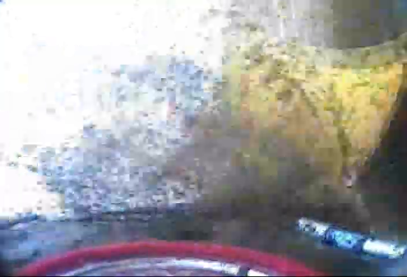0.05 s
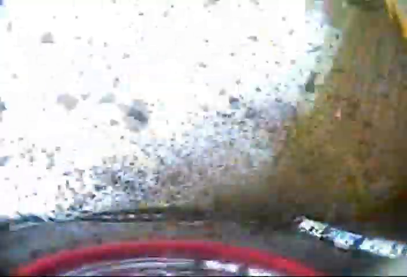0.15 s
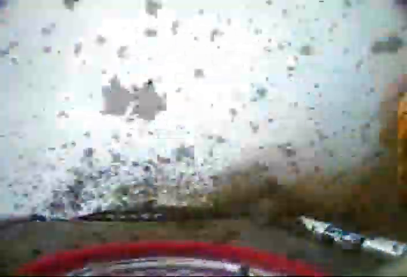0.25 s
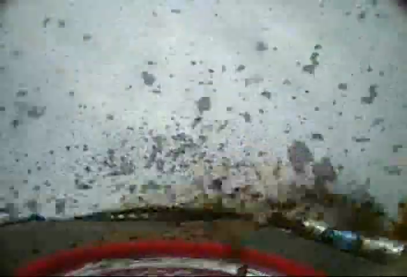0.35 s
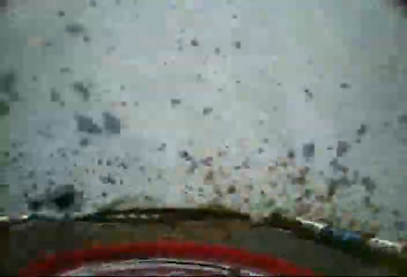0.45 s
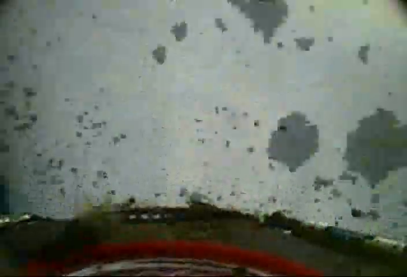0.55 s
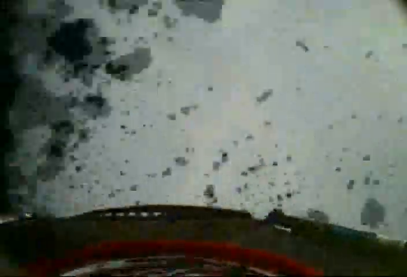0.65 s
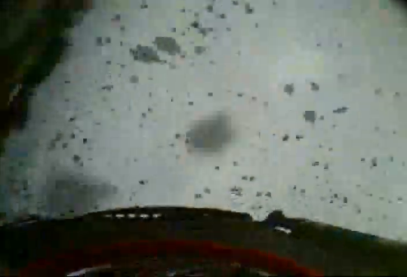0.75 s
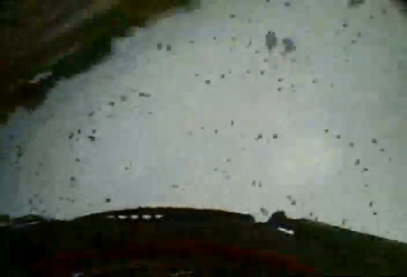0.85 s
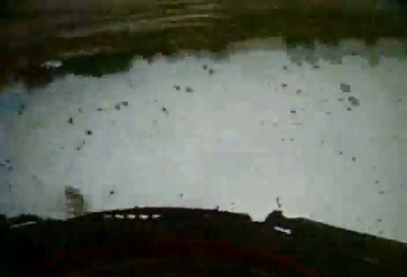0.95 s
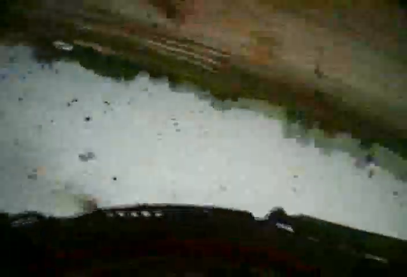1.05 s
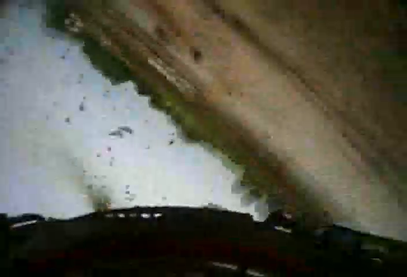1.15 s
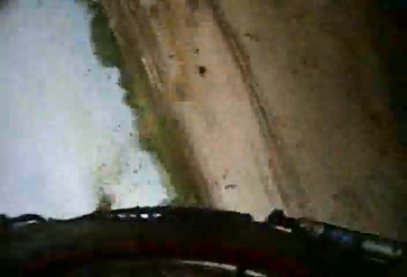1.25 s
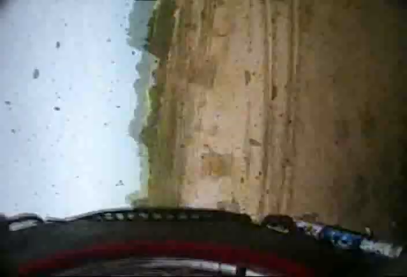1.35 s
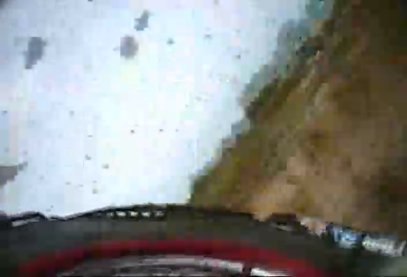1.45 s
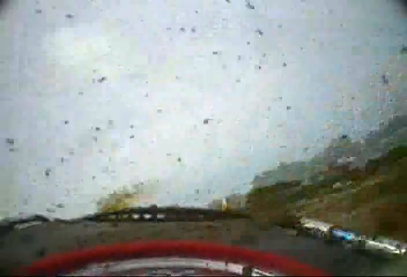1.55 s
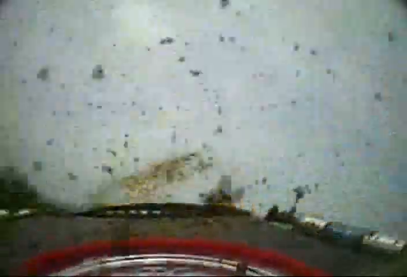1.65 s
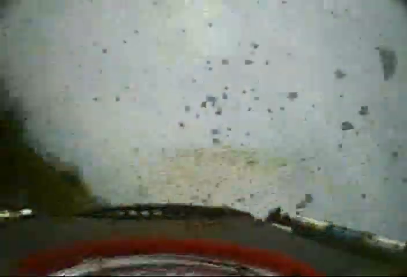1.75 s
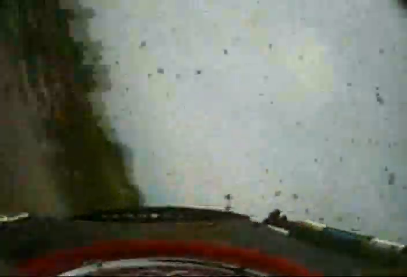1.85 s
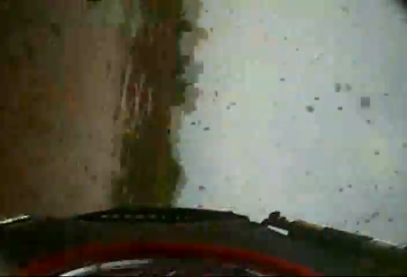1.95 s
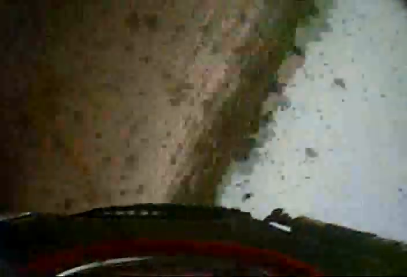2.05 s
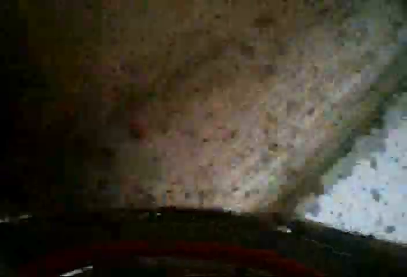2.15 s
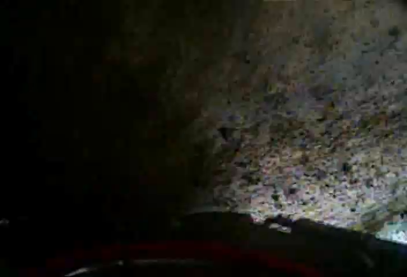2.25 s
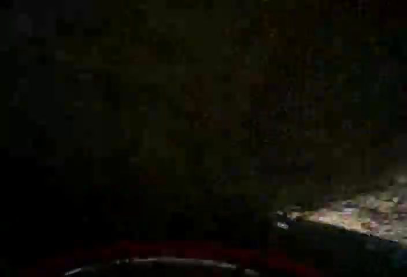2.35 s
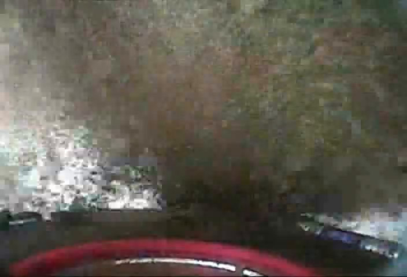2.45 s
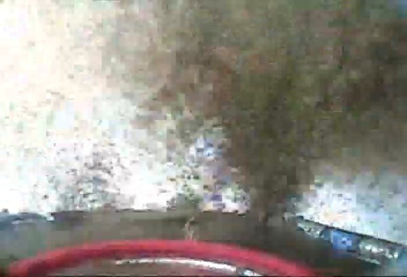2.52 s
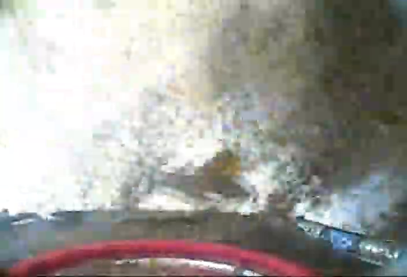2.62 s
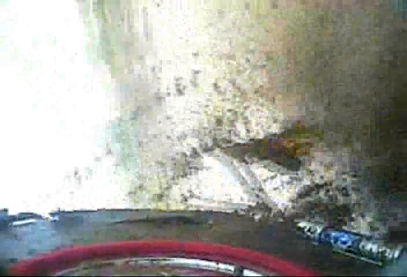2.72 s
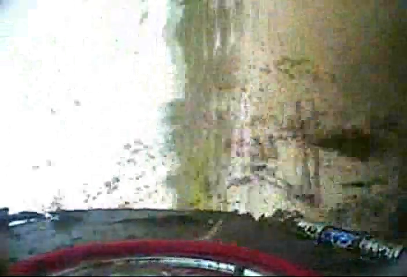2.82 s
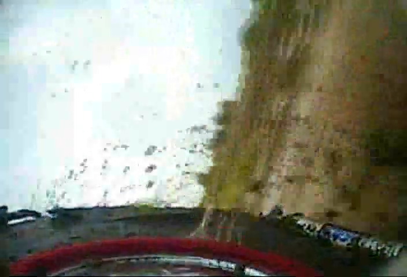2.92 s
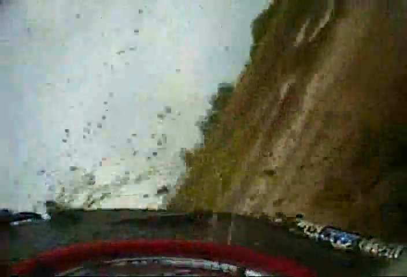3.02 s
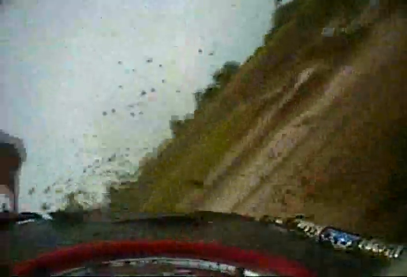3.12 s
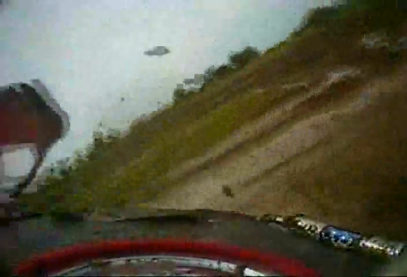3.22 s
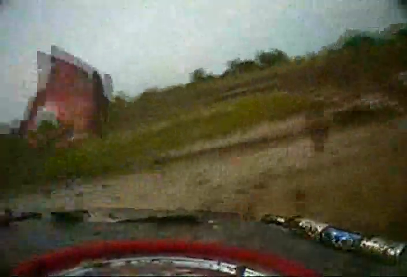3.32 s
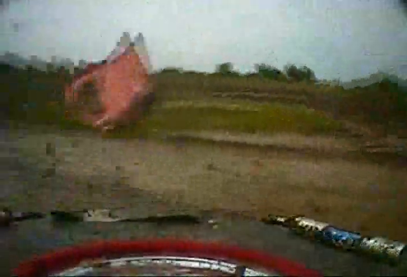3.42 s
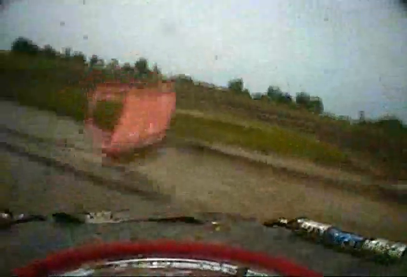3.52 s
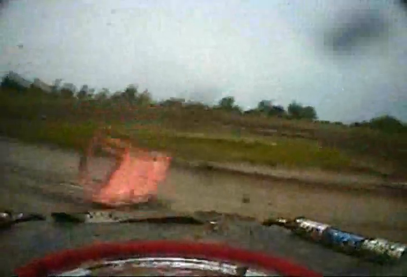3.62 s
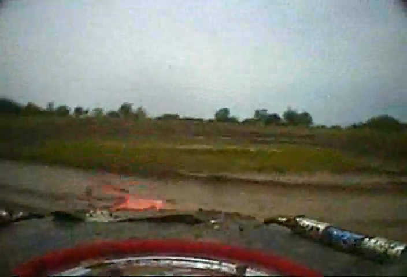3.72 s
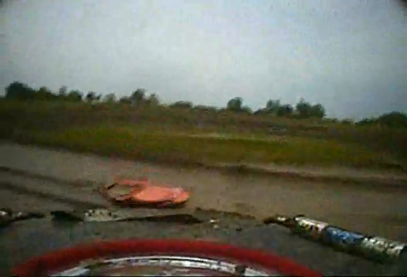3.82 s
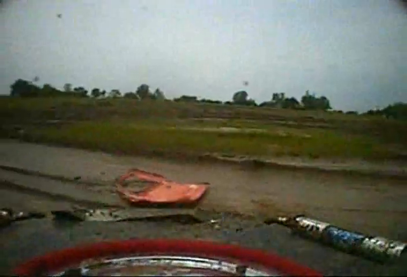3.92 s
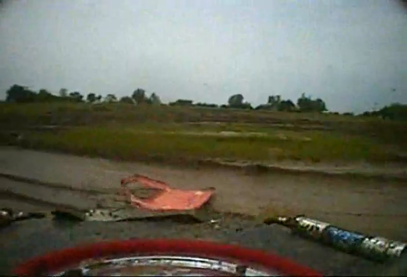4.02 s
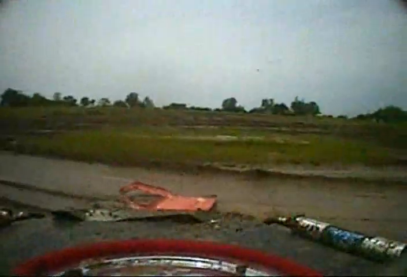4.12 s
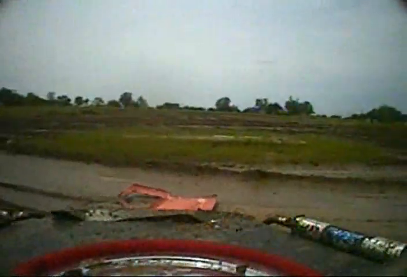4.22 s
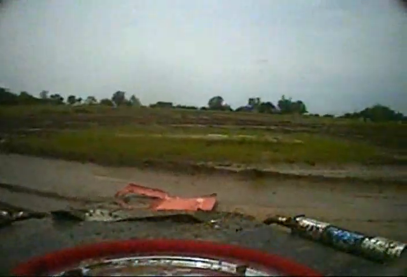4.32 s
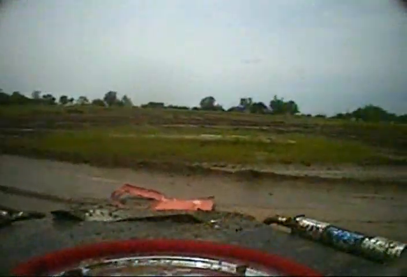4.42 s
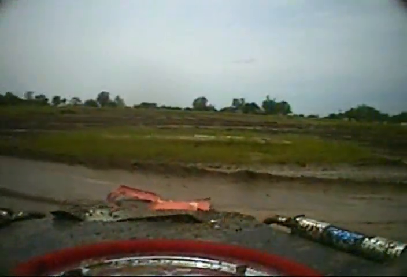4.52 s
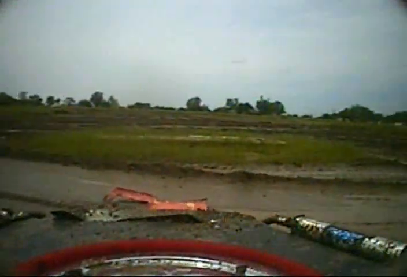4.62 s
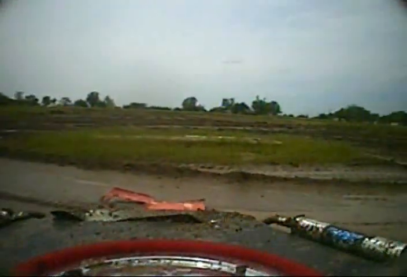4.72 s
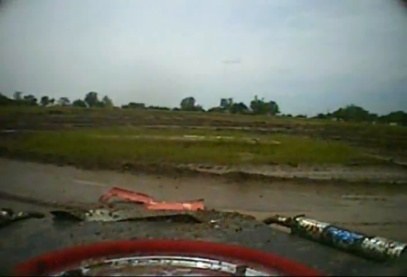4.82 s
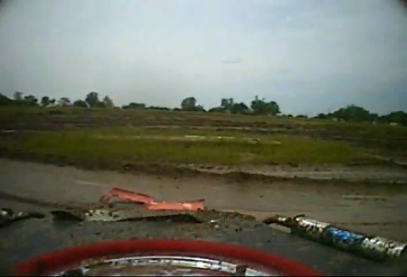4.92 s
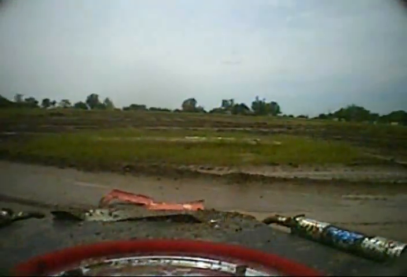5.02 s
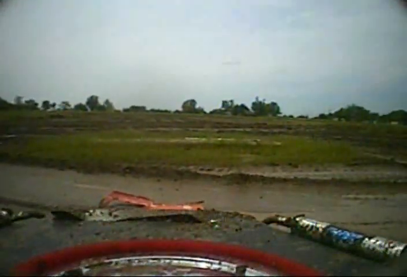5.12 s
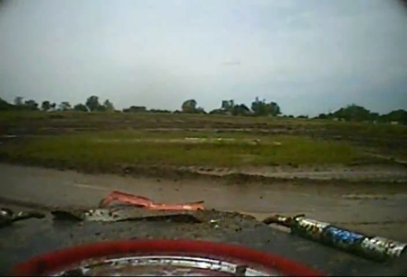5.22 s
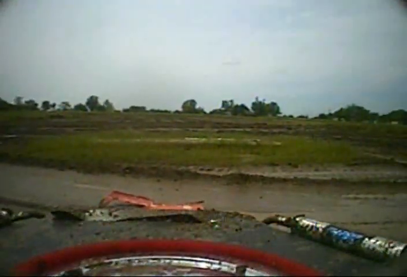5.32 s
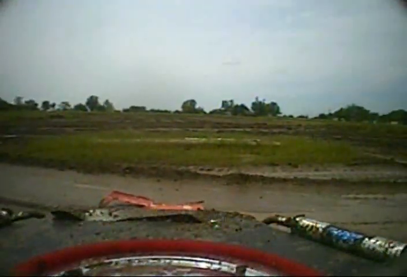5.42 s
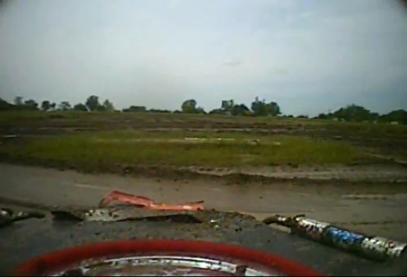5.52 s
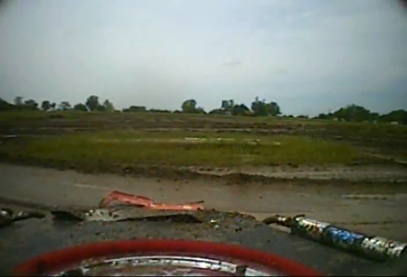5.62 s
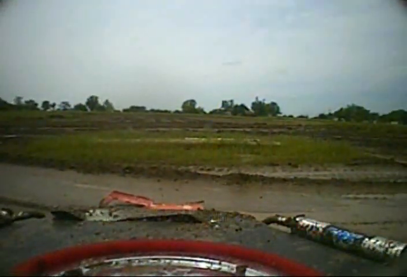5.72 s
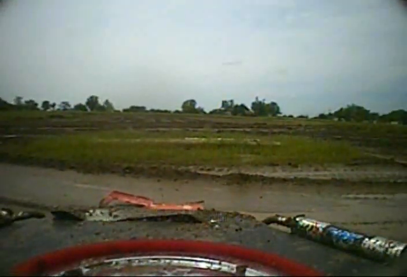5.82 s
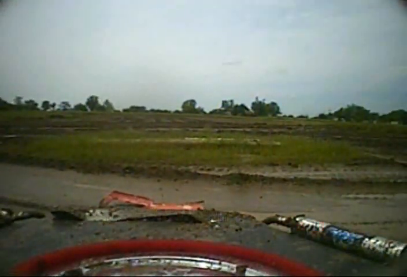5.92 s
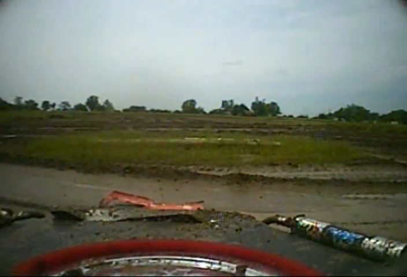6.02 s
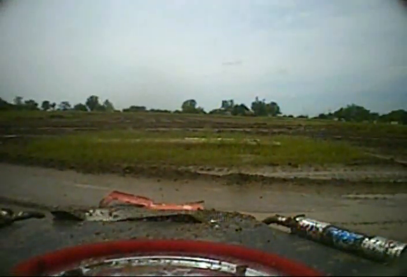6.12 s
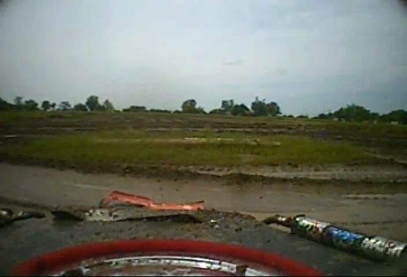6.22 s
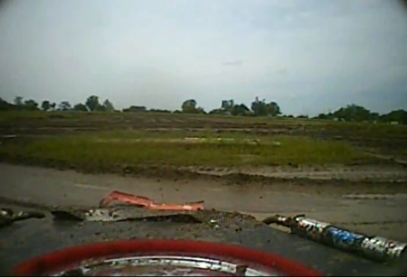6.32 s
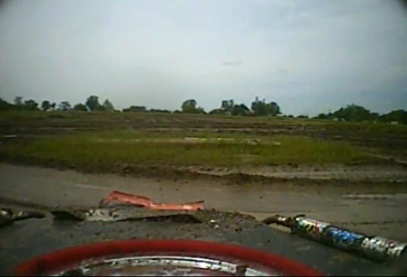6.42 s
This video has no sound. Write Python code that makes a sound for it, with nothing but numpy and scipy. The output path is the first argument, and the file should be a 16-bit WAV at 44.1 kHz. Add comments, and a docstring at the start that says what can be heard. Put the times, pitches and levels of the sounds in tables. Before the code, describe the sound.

Inside a racing truck's cab, a high-revving engine screams in harsh, clipped distortion while the vehicle tumbles with heavy thumps and panel bangs. After about two and a half seconds the engine dies abruptly. Grit patters, loose parts rattle and knock, one last hard bang lands, then only a quiet drone of other trucks remains, revving unevenly across an open muddy track.

```python
"""A racing truck's engine screams and distorts as the truck tumbles on mud, then dies about 2.5 s in.
The body thumps, shudders and knocks to rest while grit patters down and other trucks race on.
Engines are stacks of wavering sines at multiples of their cycle rate; the own engine adds roaring noise.
Landings are damped sines, knocks and grit are filtered ticks, and the far field is banded noise.
A microphone in the cab overloads, squaring off the loud engine and the hardest blows."""
import sys
import numpy as np
from scipy import signal
from scipy.io import wavfile
from scipy.ndimage import uniform_filter1d

SR = 44100
rng = np.random.default_rng(int(sys.argv[2]) if len(sys.argv) > 2 else 0)


def persist_wave(psi):
    """Save psi, clipped to +-1, as 16-bit WAV."""
    counts = np.round(np.clip(psi, -1, 1) * 32767).astype(np.int16)
    wavfile.write(sys.argv[1], SR, np.atleast_2d(counts).T)


N = 284709
T = np.arange(N) / SR  # seconds

# The truck's own engine. Each row: time in seconds, firing rate in Hz, level in dB.
OWN_REVS = [(0.0, 351.8, -9.5), (0.12, 354.2, -17), (0.23, 340.5, -12.5), (0.29, 304.6, -14),
            (0.36, 274.8, -10.5), (0.5, 331.8, -7.5), (0.54, 323.1, -13.5), (0.61, 304.8, -16.5),
            (0.72, 252.6, -16), (0.8, 293.2, -16.5), (0.85, 313.7, -16), (0.93, 302.5, -14),
            (1.1, 338.1, -9), (1.22, 332.6, -9), (1.34, 345.5, -8), (1.8, 347.5, -7.5),
            (2.05, 366.2, -10.5), (2.25, 385.2, -7.5), (2.3, 384.3, -5.5), (2.34, 353.4, -13.5),
            (2.4, 278.2, -19.5), (2.46, 243.6, -26.5), (2.52, 200, -64)]
# What surrounds the firing tone, against the engine level.
# Each row: time in seconds, uneven cylinders in dB, octave in dB, roar in dB.
OWN_MIX = [(0.0, 0.5, -31, -2.5), (0.14, 6, -24, 6), (0.25, -2, -16, 2.5), (0.4, -1.5, -3.5, -9),
           (0.47, -10.5, -15.5, -7), (0.53, 2, 1, 0.5), (0.66, 3, -5, -10.5), (0.8, 0, 5.5, 1),
           (1.1, -0.5, -5.5, -6.5), (1.36, -2, -5.5, -8), (1.6, -4, -17, -6), (1.9, -4, -15, -9.5),
           (2.2, -2.5, -10, -9.5), (2.32, -17, -13, -15), (2.4, 1.5, -5.5, -9.5)]
# Firing tone and its overtones. Each row: multiple of the cycle rate, level in dB.
FIRING_ORDERS = [(8, 0.5), (24, -28.5), (32, -21.5)]
# Tones of cylinders that fire unequally. Each row: multiple of the cycle rate, level in dB.
UNEVEN_ORDERS = [(1, -19), (2, -15.5), (3, -15), (4, -15.5), (5, -16), (6, -14.5), (7, -15), (9, -12.5),
                 (10, -11.5), (11, -6), (12, -15.5), (13, -8), (14, -10.5), (15, -9), (17, -16), (18, -20),
                 (19, -32)]
# Intake and chassis roar. Each row: centre in Hz, filter width in Hz, level in dB.
ROAR_MODES = [(81, 55, -6), (148, 94, -6.5), (420, 263, 2), (1180, 1170, -10.5), (2030, 260, -26.5),
              (8490, 9400, -29)]

# Shudder of the chassis as it tumbles and rocks. Each row: time in seconds, level in dB.
SHUDDER_SWELL = [(0.0, -50), (0.27, -13.5), (0.84, -39), (1.3, -46), (1.51, -20), (2.2, -41), (2.38, -39),
                 (2.52, -15), (2.68, -26), (3.11, -32.5), (3.4, -38), (3.96, -35.5), (4.18, -57.5),
                 (4.4, -50)]
# Heavy landings of the chassis.
# Each row: start in seconds, push in dB, swing in Hz, 60 dB decay in seconds, direction as a sign.
LANDINGS = [(0.281, -12.5, 86, 0.27, 1), (0.399, -9, 68, .14, 1), (.60, -5.5, 55, 0.14, 1),
            (1.47, -4.5, 77, 0.16, -1), (1.679, -3.5, 40, 0.29, -1), (1.848, -3, 51, 0.069, -1),
            (2.361, -9, 64, .087, -1), (2.437, -8.5, 33, 0.34, 1), (2.536, -13, 40.5, 0.3, -1),
            (2.61, -7.5, 46, 0.19, -1), (2.692, -13, 74, 0.28, 1), (2.849, -22, 81, 0.38, 1),
            (3.003, -9.5, 71, 0.14, -1), (3.048, -14, 42, 0.11, 1), (3.079, -13, 37, 0.065, -1),
            (3.096, -7, 24.2, 0.15, -1), (3.157, -19.5, 60, 0.67, 1), (3.56, -13, 11.8, 0.4, -1),
            (3.596, -17, 53, 0.12, 1), (3.626, -18.5, 87, .2, -1), (3.768, -18, 26, 0.082, -1),
            (3.8, -8.5, 39, 0.32, -1), (3.869, -16, 74, .25, -1), (4.03, -19, 69, 0.16, 1)]
# Panels, clods and loose parts strike the cab. Each row: start in seconds, panel peak in dB,
# panel pitch in Hz, crack in dB against the panel, 60 dB decay of the rattle in seconds.
BLOWS = [(0.239, -6, 1090, -17, 0.045), (0.579, -0.5, 1196, -0.5, 0.046), (1.126, -16, 1290, -18, 0.056),
         (1.418, -3, 1070, -15, 0.033), (1.986, -6, 1370, 2, .03), (2.453, -22, 2000, -27, 0.069),
         (2.543, -27, 1040, -3, .04), (2.563, -34, 1040, -7, 0.036), (2.582, -30, 1100, -20, 0.042),
         (2.619, -22, 1000, -10, 0.14), (2.66, -27, 1100, -23, 0.035), (2.723, -30, 1020, -18, 0.073),
         (2.738, -26.5, 1920, -16, 0.072), (2.818, -26, 1440, -22, 0.018), (2.852, -29, 1036, -17, .03),
         (2.915, -32, 1100, -25, 0.028), (3.005, -20.5, 2040, -26, 0.065), (3.018, -18, 1850, -30, 0.07),
         (3.03, -25, 1813, -18, 0.064), (3.054, -27, 1000, -25, 0.031), (3.083, -28, 1020, -31, 0.065),
         (3.102, -20.5, 1000, -20, 0.087), (3.111, -13.5, 1220, -13, 0.061), (3.118, -18, 1260, -10, .04),
         (3.129, -8, 1070, -25, 0.027), (3.274, -42, 2000, -25, 0.048), (3.307, -39, 1410, -30, .04),
         (3.558, -38, 990, -8, 0.036), (3.568, -14, 1080, -11.5, 0.045), (3.586, -18, 990, -20, .035),
         (3.594, -23, 1040, -37, 0.038), (3.614, -15.5, 1100, -12, 0.03), (3.629, -27.5, 1050, -23, .05),
         (3.664, -38, 2200, 4, .03), (3.732, -34.5, 2100, -1, 0.047), (3.753, -38, 2000, -25, 0.037),
         (3.766, -29, 1530, -25, 0.085), (3.776, -26.5, 1990, -25, 0.066), (3.808, -2, 1007, -11, 0.032),
         (3.817, -6, 1240, -18, 0.052)]
# Panel modes rung by every blow. Each row: centre in Hz, width in Hz, gain in dB.
PANEL_MODES = [(764, 180, -6), (1340, 290, -24), (1930, 210, -23.5)]

# The far field swells and draws away.
# Each row: time in seconds, drone in dB, hiss in dB, upper hiss in dB against the hiss.
FAR_SWELL = [(2.3, -16, -44, -14), (2.62, -22.5, -55, -9.5), (2.98, -28.5, -61.5, -6),
             (3.15, -23.5, -61.5, -7), (3.36, -29.5, -62, -13), (3.84, -27.5, -56.5, -10.5),
             (4.3, -31.5, -59.5, -19), (4.5, -31.5, -62, -16), (4.75, -32.5, -57, -9),
             (4.95, -34, -67, -14.5), (5.3, -32, -62, -18), (5.6, -34, -63, -15.5),
             (6.0, -32.5, -57.5, -19), (6.23, -36, -62.5, -18), (6.46, -35.5, -69.5, -15)]
# Colour of the drone. Each row: frequency in Hz, relative density in dB per Hz before the treble tilt.
FAR_COLOUR = [(18, -41), (30, 0), (108, -6.5), (166, 1.5), (229, -1), (274, 2), (386, -8), (520, -7.5),
              (683, -30), (1290, -44.5)]
# Main modes of the microphone housing. Each row: centre in Hz, filter width in Hz, level in dB.
HOUSING_MODES = [(910, 190, -1), (1620, 760, 0.5), (1985, 260, -1), (2150, 350, -4)]
# Upper modes of the housing. Each row: centre in Hz, filter width in Hz, level in dB.
WHISTLE_MODES = [(3480, 280, 4.5), (4470, 560, -0.5), (5100, 400, -9)]
# Clods and grit raining on the cab. Each row: time in seconds, level in dB.
MUD_SWELL = [(2.3, -26), (2.5, -46), (2.75, -44.5), (2.95, -58.5), (3.3, -64.5), (3.9, -56.5)]

# Throttle bursts from other trucks, and one low boom of the truck's body near 2.6 s.
# Each row: start in seconds, end in seconds, firing rate (or boom pitch) in Hz at start, middle and end,
# level in dB at start and end.
BURSTS = [(2.44, 2.66, 317.2, 319.3, 320.6, -25, -24.5), (2.68, 3.05, 334, 355, 337, -24, -27.5),
          (2.56, 2.693, 144.3, 151.7, 150.5, -19.5, -15.5), (3.16, 3.348, 231.7, 244.8, 281, -35, -25),
          (3.36, 3.556, 333, 320, 326, -28, -30.5), (3.57, 3.768, 300, 264.4, 239, -25.5, -36.5),
          (3.7, 3.807, 300.3, 301.7, 317, -28, -31), (3.85, 4.146, 305.5, 347.2, 362, -25.5, -38),
          (3.92, 4.303, 193.7, 182.2, 197, -33.5, -44), (4.13, 4.431, 261.4, 285.4, 273, -31, -34.5),
          (4.46, 4.786, 262.4, 248.3, 255, -40, -37.5), (4.8, 5.05, 268.6, 289.5, 308.6, -29.5, -48),
          (5.0, 5.226, 198.3, 187.8, 165, -29.5, -32.5), (5.24, 5.426, 171, 193.4, 226, -27, -40),
          (5.16, 5.397, 288.4, 288.5, 297, -33, -33.5), (5.36, 5.682, 155.4, 147.8, 136, -37, -45.5),
          (5.74, 5.827, 247.5, 251.5, 290, -38, -30), (5.88, 6.271, 308.8, 352, 345, -39, -33),
          (5.9, 6.449, 151.3, 164, 142, -40.5, -38.5), (6.13, 6.323, 245, 273, 294.5, -38, -39.5)]
# Tone of those bursts. Each row: multiple of the cycle rate, level in dB.
BURST_ORDERS = [(4, -16.5), (5, -22), (6, -22.5), (7, -15.5), (8, -0.5), (9, -24), (10, -23), (12, -18.5),
                (16, -24.5)]
# First lumpy rising pull. Each row: time in seconds, cycle rate in Hz, level in dB.
FIRST_PULL = [(4.17, 34.5, -50), (4.22, 35.06, -44), (4.46, 41.7, -37.5), (4.57, 45.38, -34.5),
              (4.7, 47, -36), (4.89, 48.77, -36.5), (4.95, 50.26, -62)]
# Tone of the first pull. Each row: multiple of the cycle rate, level in dB.
FIRST_PULL_ORDERS = [(1, -18), (2, -22.5), (3, 6), (4, -2.5), (5, -5.5), (6, 0), (7, -28), (8, -14),
                     (9, -19.5), (10, -22), (11, -30), (12, -18), (13, -21.5), (14, -37), (15, -23.5),
                     (16, -20.5), (17, -36.5), (18, -43.5), (19, -33.5), (20, -47.5), (21, -33), (22, -37),
                     (23, -26.5), (24, -41.5), (25, -27.5), (26, -44)]
# Second lumpy pull at higher revs. Each row: time in seconds, cycle rate in Hz, level in dB.
SECOND_PULL = [(5.5, 57.44, -40), (5.64, 61.76, -40), (5.82, 63.1, -45), (5.86, 64.6, -47)]
# Tone of the second pull. Each row: multiple of the cycle rate, level in dB.
SECOND_PULL_ORDERS = [(1, -18), (2, -19), (3, 2.5), (4, 3), (5, -16), (6, -6.5), (7, -7), (8, -2.5),
                      (9, -19), (10, -21)]

CAB_HZ = 686  # the cab passes engine tones up to here and muffles the rest
CONTACT_HZ = 2700  # a blow lasts long enough to dull what it excites above this
LOW_RING_DB, LOW_RING_SLOPE = -7, 0.48  # low ring of a 0 dB blow; dB per dB of blow
DRONE_TILT_DB = -1  # per octave above 300 Hz
HOUSING_TOP_HZ = 2610
BURST_ATTACK_S, BURST_RELEASE_S, BURST_WAVER_DB = 0.03, 0.03, 2.5
CLIP_LEVEL, KNEE = 0.2, 18  # overload ceiling; a higher knee number turns the corner harder
COUPLING_HZ, SOFT_HZ, TOP_HZ = 16, 10600, 12800  # bass cut, gentle treble cut, steep treble cut
LEFT_BASS_DB, LEFT_BASS_HZ = -29, 1000


def undb(db):
    """Turn decibels into an amplitude factor."""
    return 10 ** (np.asarray(db) / 20)


def unit(x):
    """Scale a sound to rms 1."""
    return x / np.sqrt(np.mean(x ** 2))


def curves(rows, fade=0.021):
    """Join columns by straight lines; a gate fades over `fade` seconds just outside the ends."""
    s, *columns = np.transpose(rows)
    gate = np.clip(np.minimum(T - s[0], s[-1] - T) / fade + 1, 0, 1)
    return gate, [np.interp(T, s, c) for c in columns]


def band(x, hz, width):
    """Two-pole resonance, gain 1 at the centre."""
    b, a = signal.iirpeak(hz, hz / width, SR)
    return signal.lfilter(b, a, x)


def ringing(modes):
    """Noise heard through a set of resonances, rms 1."""
    total = 0
    for hz, width, db in modes:
        once = band(rng.standard_normal(N), hz, width)
        total = total + undb(db) * unit(band(once, hz, 2 * width))
    return unit(total)


def walk(rate):
    """Random levels, `rate` new ones a second, smoothed twice; spread near 1."""
    hold = int(SR / rate)
    steps = np.repeat(rng.standard_normal(N // hold + 1), hold)
    return 1.3 * uniform_filter1d(uniform_filter1d(steps, hold), hold)[:N]


def orders(cycle_hz, gain, table, wobble_db, drift):
    """Multiples of the engine cycle; each wavers in level and phase (radians) as firings differ."""
    on = np.flatnonzero(gain > 1e-6)  # only the audible samples
    out = np.zeros(N)
    turn = 2 * np.pi * np.cumsum(cycle_hz[on]) / SR
    knots = np.arange(0, N + 800, 800)  # a new chance value every 18 ms
    for multiple, db in table:
        chances = rng.standard_normal((2, len(knots)))
        waver, slip = (np.interp(on, knots, chance) for chance in chances)
        phase = round(multiple) * turn + 2 * np.pi * rng.random() + drift * slip
        out[on] += undb(db + wobble_db * waver) * np.sin(phase)
    return np.sqrt(2) * gain * out


def engine():
    """Eight firings a cycle scream; uneven cylinders, an octave and a once-a-cycle roar surround them."""
    gate, (firing_hz, level_db) = curves(OWN_REVS)
    _, (uneven_db, octave_db, roar_db) = curves(OWN_MIX)
    cycle_hz = firing_hz / 8
    gain = gate * undb(level_db)
    tone = orders(cycle_hz, gain, FIRING_ORDERS, wobble_db=2.92, drift=0.3)
    octave = orders(cycle_hz, gain * undb(octave_db), [(16, 0)], wobble_db=2.0, drift=0.5)
    uneven = orders(cycle_hz, gain * undb(uneven_db), UNEVEN_ORDERS, wobble_db=2.5, drift=0.22)
    cab = signal.cheby1(4, 1, CAB_HZ, fs=SR, output="sos")
    muffled = signal.sosfilt(cab, octave + uneven)
    pulse = 1 + 0.17 * np.cos(2 * np.pi * np.cumsum(cycle_hz) / SR)
    roar = gain * undb(roar_db) * pulse * ringing(ROAR_MODES)
    return tone + muffled + roar


def chassis():
    """Low shudder of the frame and the heavy, damped swing of each landing."""
    gate, (db,) = curves(SHUDDER_SWELL)
    out = gate * undb(db) * ringing([(33.7, 13, 3.5), (67, 38, 1), (105, 25, -11)])
    for start, push_db, hz, t60, direction in LANDINGS:
        t = np.clip(T - start, 0, None)
        swing = np.sin(2 * np.pi * hz * t) * np.exp(-np.log(1000) * t / t60)
        out += np.sign(direction) * undb(push_db) * swing
    return out


def knocks():
    """Each blow's sharp tick and ragged rattle excite a panel, a low ring and a short crack."""
    out, length = np.zeros(N), SR // 4
    t = T[:length]
    for start, peak_db, hz, crack_db, t60 in BLOWS:
        noise, scatter = rng.standard_normal((2, length))
        # the rattle holds briefly, then dies fast
        fall = np.exp(-np.log(1000) * (t / t60) ** 1.27)
        # contacts come in clumps of about 2 ms
        clumps = np.repeat(scatter[:length // 100 + 1], 100)[:length]
        rattle = noise * fall * undb(3 * clumps)
        rattle[:6] += 2.5  # the sharp tick
        push = signal.lfilter(*signal.butter(2, CONTACT_HZ, fs=SR), rattle)
        panel = band(push, hz, 150.0)
        for mode_hz, width, gain_db in PANEL_MODES:
            panel = panel + undb(gain_db) * band(push, mode_hz, width)
        low = band(band(push, 417.0, 280.0), 536.0, 400.0)
        crack = band(band(rattle * fall, 3000.0, 3000.0), 3300.0, 4000.0)
        low_db = LOW_RING_DB + LOW_RING_SLOPE * peak_db
        layers = ((peak_db, panel), (low_db, low), (peak_db + crack_db, crack))
        first = int(start * SR)
        for db, layer in layers:
            out[first:first + length] += undb(db) * layer / np.abs(layer).max()
    return out


def field():
    """Far engines blur into a drone whose bands flicker; a thin hiss rings in the microphone housing."""
    gate, (drone_db, hiss_db, whistle_db) = curves(FAR_SWELL)
    colour_hz, density_db = np.transpose(FAR_COLOUR)
    drone = 0
    for centre in 40 * 2 ** np.arange(0, 4.3, 1 / 3):  # third-octave bands
        # wider bands gather more power
        band_db = np.interp(np.log(centre), np.log(colour_hz), density_db) + 10 * np.log10(centre)
        band_db = band_db + 2.5 * walk(14)
        band_db += DRONE_TILT_DB * max(np.log2(centre / 300), 0)
        drone = drone + undb(band_db) * ringing([(centre, centre / 5, 0)])
    hiss = 0
    for hz, width, db in HOUSING_MODES:
        hiss = hiss + undb(hiss_db + 2.0 * walk(25) + db) * ringing([(hz, width, 0)])
    hiss = signal.sosfilt(signal.cheby1(6, 1, HOUSING_TOP_HZ, fs=SR, output="sos"), hiss)
    hiss += undb(hiss_db + whistle_db + 1.8 * walk(74)) * ringing(WHISTLE_MODES)
    return gate * (undb(drone_db) * unit(drone) + hiss)


def mud():
    """Scattered grit ticks of unequal size ring the panels and the housing."""
    gate, (db,) = curves(MUD_SWELL)
    when, size = rng.random(N), rng.exponential(size=N)
    hits = when < 300 / SR  # about 300 ticks a second
    ticks = hits * undb(4 * np.minimum(size, 3.5))
    ring = 0
    for hz, width, gain_db in [(1150, 610, 11.5), (2080, 220, 8.5), (4240, 2550, -14)]:
        ring = ring + undb(gain_db) * band(band(ticks, hz, width), hz, 2 * width)
    return gate * undb(db) * unit(ring)


def burst(start, end, first_hz, middle_hz, last_hz, first_db, last_db):
    """Pitch bends smoothly through start, middle and end; the level swells, slides, wavers and lets go."""
    u = np.clip((T - start) / (end - start), 0, 1)
    # a parabola through the three rates
    hz = first_hz * (1 - u) * (1 - 2 * u) + middle_hz * (2 * u) * (2 - 2 * u) + last_hz * u * (2 * u - 1)
    edges = np.minimum((T - start) / BURST_ATTACK_S, (end - T) / BURST_RELEASE_S)
    shape = np.clip(edges + 0.5, 0, 1)  # half open at start and end
    level_db = first_db + (last_db - first_db) * u + BURST_WAVER_DB * walk(20)
    return hz, shape * undb(level_db)


def rivals_and_boom():
    """Other trucks give throttle bursts and two lumpy pulls; one low body boom is built like a burst."""
    out = 0
    for row in BURSTS:
        firing_hz, gain = burst(*row)
        out = out + orders(firing_hz / 8, gain, BURST_ORDERS, wobble_db=1.8, drift=0.3)
    # two pull with rising revs, lumpy enough to hear the whole cycle
    for rows, table in ((FIRST_PULL, FIRST_PULL_ORDERS), (SECOND_PULL, SECOND_PULL_ORDERS)):
        gate, (cycle_hz, db) = curves(rows)
        out = out + orders(cycle_hz, gate * undb(db), table, wobble_db=1.0, drift=0.2)
    return out


def scene():
    """One microphone capsule hears everything; both channels start alike."""
    mono = engine() + chassis() + knocks() + field() + mud() + rivals_and_boom()
    return np.array([mono, mono])


def record(dry):
    """The input clips with a short knee, a coupling capacitor tilts the flat tops, and treble is cut."""
    x = dry / (1 + np.abs(dry / CLIP_LEVEL) ** KNEE) ** (1 / KNEE)
    x = signal.lfilter(*signal.butter(1, COUPLING_HZ, "high", fs=SR), x)
    x = signal.lfilter(*signal.butter(1, SOFT_HZ, fs=SR), x)
    # the left channel gets a little more bass, the right a little less
    bass = signal.filtfilt(*signal.bessel(2, LEFT_BASS_HZ, fs=SR), x)
    x = x + undb(LEFT_BASS_DB) * np.array([[1], [-1]]) * bass
    return signal.sosfilt(signal.ellip(10, 0.2, 70, TOP_HZ, fs=SR, output="sos"), x)


dry = scene()
out = record(dry)
persist_wave(out)
```